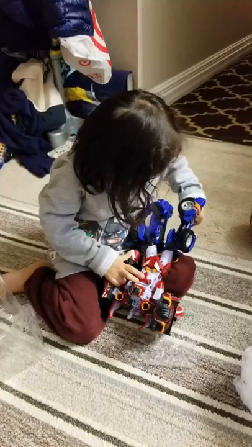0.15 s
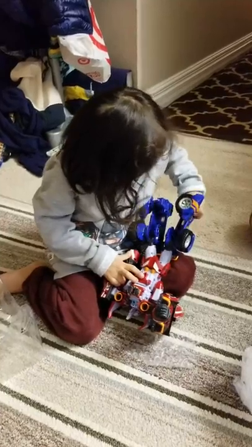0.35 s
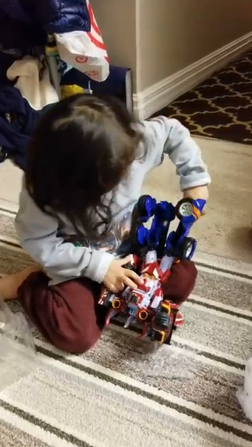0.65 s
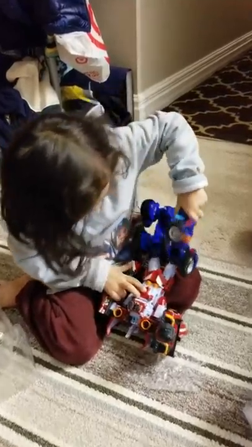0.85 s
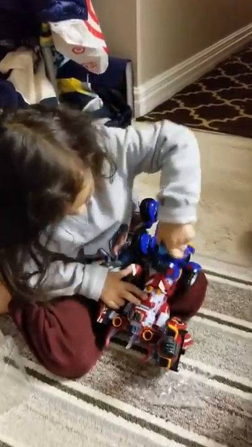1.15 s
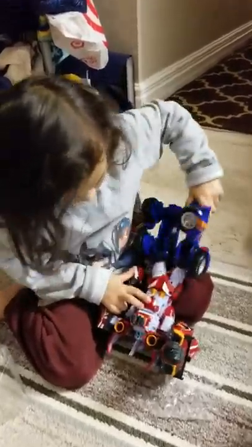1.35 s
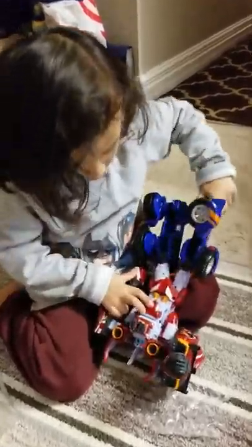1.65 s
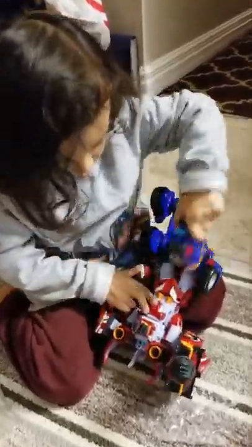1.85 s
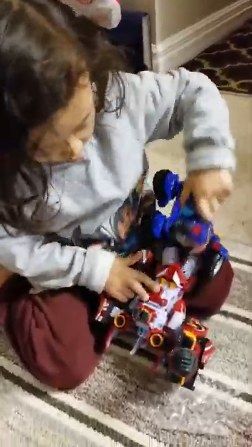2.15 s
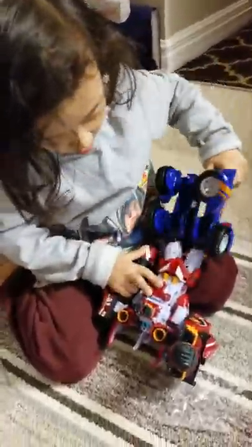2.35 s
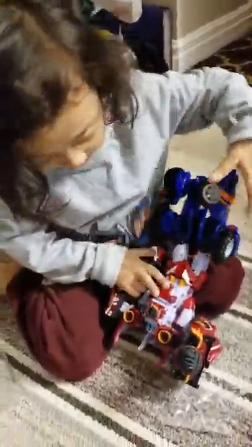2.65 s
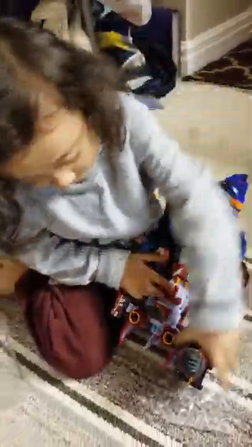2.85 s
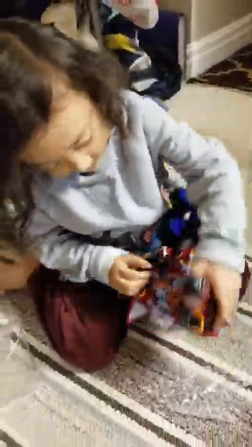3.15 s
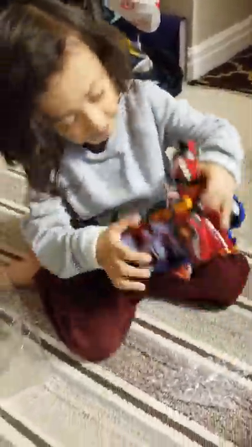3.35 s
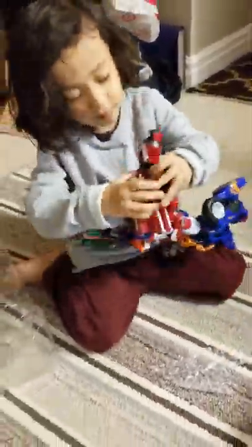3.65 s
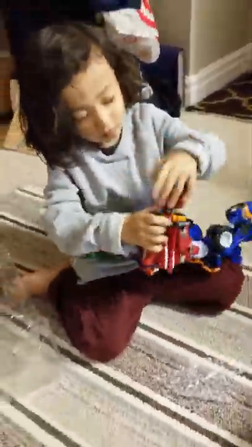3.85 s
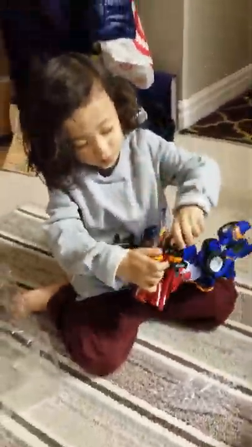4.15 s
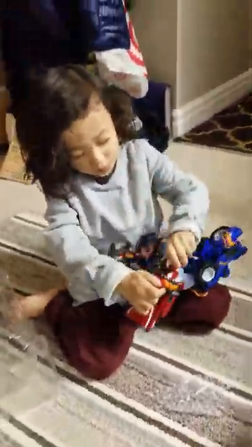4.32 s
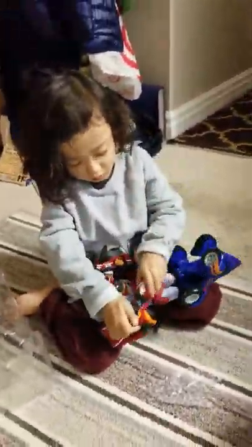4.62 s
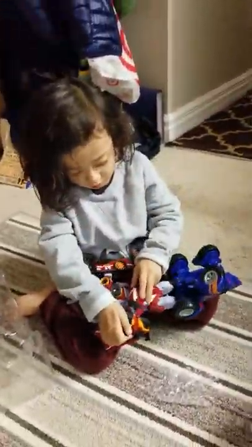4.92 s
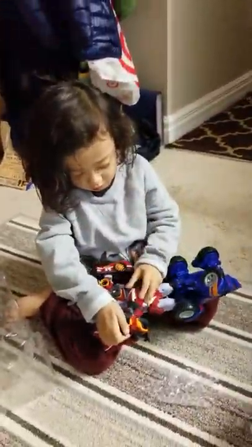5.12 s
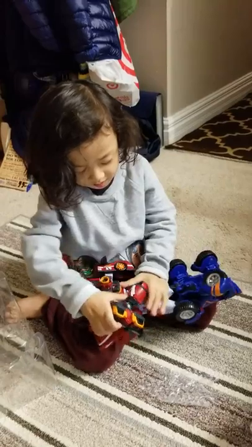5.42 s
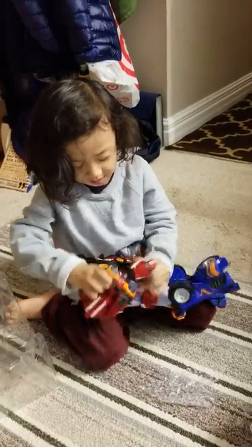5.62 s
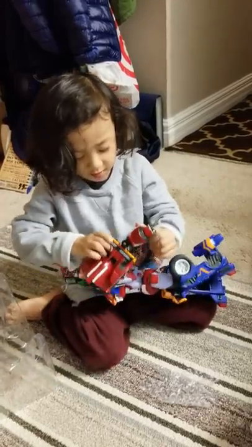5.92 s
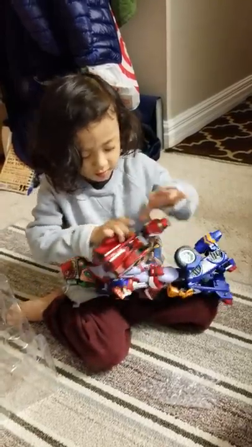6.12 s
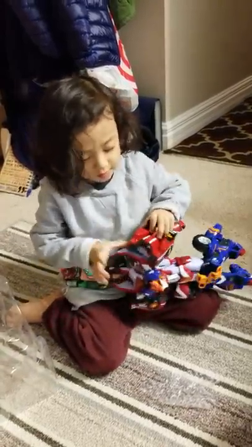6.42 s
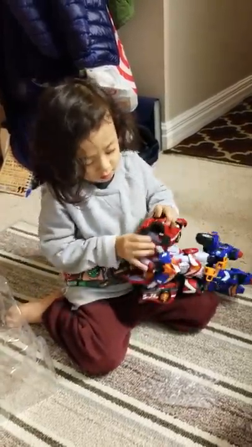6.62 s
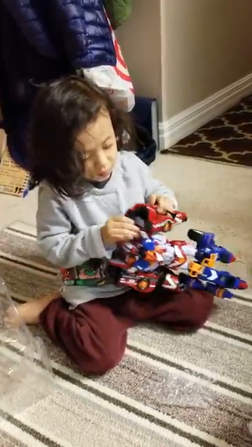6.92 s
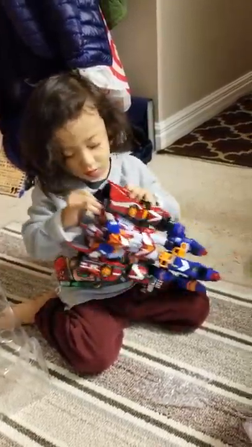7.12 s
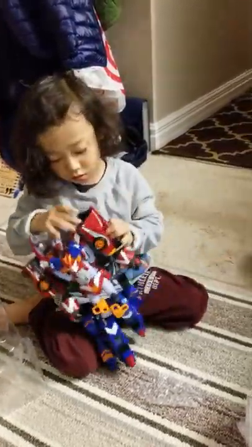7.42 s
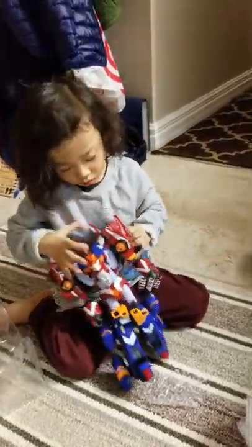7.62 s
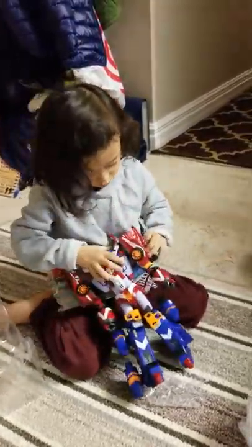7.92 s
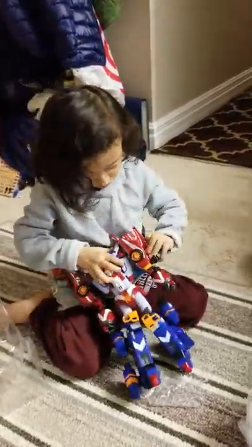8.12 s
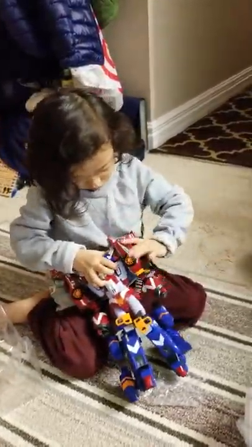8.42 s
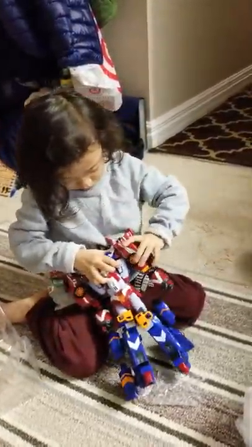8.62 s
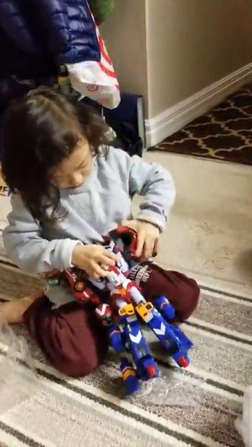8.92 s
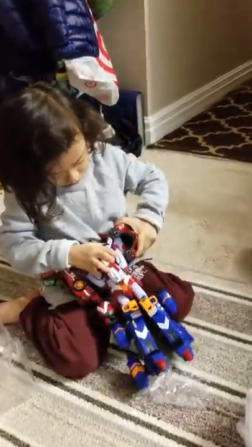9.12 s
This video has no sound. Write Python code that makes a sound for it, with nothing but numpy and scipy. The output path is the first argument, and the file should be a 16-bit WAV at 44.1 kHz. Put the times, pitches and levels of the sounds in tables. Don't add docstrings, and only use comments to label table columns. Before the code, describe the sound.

A phone a metre away picks up bright, dry cracks from a plastic toy's ratchet joints, each with a hollow knock and short room reflection. Dense loud runs give way to scattered clacks, a slower clicking joint and a brief lower hinge burst. Fingers rub plastic, shells rattle and sleeves shuffle lightly. The ending is quieter, with small clicks and ticks over a distant appliance hum and soft hiss.

```python
import sys
import numpy as np
from scipy import signal
from scipy.fft import rfft, irfft, next_fast_len
from scipy.io import wavfile
from scipy.ndimage import uniform_filter1d

SR = 44100
rng = np.random.default_rng(int(sys.argv[2]) if len(sys.argv) > 2 else 0)


def elevation(decibels):
    levels = np.asarray(decibels, float)
    return 10 ** (levels / 20)


def to_wav(s):
    ch = np.atleast_2d(s).T
    pcm = np.round(np.clip(ch, -1, 1) * 32767)
    wavfile.write(sys.argv[1], SR, pcm.astype(np.int16))


N = 408807

# (frequency [Hz], density [dB per Hz])
AIR = [(12, -49.5), (20, -16), (116, 0), (146, -9), (262, -22), (301, -17.5), (434, -33), (513, -28.5),
       (949, -35), (1090, -32.5), (1760, -33.5), (2600, -41.5), (16000, -42)]
# (time [s], level [dB])
RUMBLE = [(0, -63.5), (.85, -61.5), (2.2, -66), (3.3, -63.5), (5.6, -68.5), (6.5, -73), (7.3, -64.5),
          (8.2, -67), (9.27, -64.5)]
# (time [s], length [s], level [dB], pitch [Hz])
DRAGS = [
    (5.03, 0.27, -83, 1750),
    (7.905, 0.284, -78.5, 1580),
    (8.05, 0.068, -75, 5400),
    (8.2, 0.074, -72, 4300),
    (8.4, 0.14, -75, 3300),
    (5.358, .06, -74, 5700),
    (6.3, 0.15, -76.5, 3200),
    (4.1, 0.19, -60, 1300),
    (.2, 0.23, -84, 1450),
]
# (time [s], finger rub level [dB])
EFFORT = [(.55, -98), (.8, -63.5), (2.22, -73.5), (2.6, -84), (3.07, -63.5), (3.4, -66), (4.05, -75.5),
          (4.4, -71), (4.85, -90), (5.4, -81.5), (5.73, -66.5), (6.1, -89.5), (6.38, -55.5), (6.7, -92.5),
          (7.1, -62.5), (7.64, -61), (7.9, -81), (9.27, -80)]
# (frequency [Hz], density [dB per Hz])
RUB_COLOUR = [(1470, -26.5), (2500, -9), (3360, -10), (5030, 7), (8940, -7), (12400, -1), (16000, -14.5)]

# (time [s], crack peak [dB], shell knock peak [dB])
LEG_OUT = [(.6023, -9, -15), (.663, -9, -24), (.6666, -11.5, -12.5), (.7196, -6.5, -9.5),
           (.7731, -5.5, -11), (.8099, -7, -15), (.8511, -5.5, -9.5), (.8881, -8, -20), (.9245, -10.5, -12),
           (.958, -7.5, -21), (.9946, -7, -24), (1.0337, -9, -20.5)]
LEG_IN = [(1.1699, -7, -21), (1.2048, -6.5, -27.5), (1.2293, -5, -14), (1.2517, -2.5, -26),
          (1.2722, -5.5, -19.5), (1.2957, -8, -12.5), (1.3685, -8, -17.5), (1.4242, -6, -13.5)]
LEG_BACK = [(1.738, -10, -12.5), (1.7553, -7.5, -25), (1.7763, -5, -15.5), (1.8, -8.5, -18),
            (1.8272, -10, -16), (1.8551, -9, -27), (1.8922, -9, -23.5), (1.9417, -11.5, -29),
            (2.1013, -11, -30), (2.1336, -7, -18), (2.1611, -8.5, -19), (2.1926, -4.5, -16.5),
            (2.232, -6, -21), (2.2673, -6.5, -18), (2.3035, -9, -16.5)]
ARM = [(4.0975, -18.5, -41), (4.1802, -17, -37), (4.225, -6, -17), (4.262, -6.5, -21.5),
       (4.3228, -20.5, -29), (4.3419, -7.5, -20), (4.42, -10, -13), (4.4551, -8, -19), (4.5371, -17, -28.5),
       (4.5769, -9.5, -16), (4.6183, -8.5, -19), (4.635, -8.5, -43.5)]
HINGE = [(5.6, -9, -23), (5.6118, -4.5, -18.5), (5.6172, -12.5, -21.5), (5.6286, -12, -24.5),
         (5.6549, -7, -37), (5.6788, -10, -15.5), (5.7296, -6.5, -26.5), (5.7724, -9.5, -19)]
WING = [(6.8977, -22, -47), (6.9966, -17, -50), (7.067, -17.5, -50), (7.1584, -20, -45)]
SHOULDER = [(8.4978, -14.5, -27.5), (8.6526, -21.5, -37), (8.6884, -9, -32), (8.6971, -19, -32),
            (8.7253, -10, -40), (8.7348, -25, -30), (8.7506, -12.5, -29), (8.7644, -17, -38),
            (8.7825, -14.5, -47), (8.8035, -23.5, -44), (9.0989, -19, -42.5), (9.1205, -19.5, -45.5),
            (9.1317, -23, -56), (9.2664, -30.5, -66)]
# (teeth table, treble share [dB], left minus right [dB], shell pitch [Hz], knock lag [s])
JOINTS = [
    (LEG_OUT, -13.5, 2, 2070, .008),
    (LEG_IN, -15.5, 2, 2040, .004),
    (LEG_BACK, -15, 3.6, 1970, .009),
    (ARM, -12.5, 5.5, 2240, -.001),
    (HINGE, -13, 5, 1380, -.001),
    (WING, -11, 8.9, 1920, 0.000946),
    (SHOULDER, -11.5, 4.2, 1966, -0.00078),
]
# (time [s], crack peak [dB])
LIFT = [(2.5782, -50.5), (2.772, -58), (2.8535, -32.5), (2.8915, -19.5), (2.9033, -44), (3.0372, -42),
        (3.077, -47), (3.2131, -31.5), (3.2274, -38), (3.2755, -39), (3.333, -43.5), (3.4083, -46),
        (3.539, -54), (3.5483, -45), (3.6202, -45), (3.6995, -44.5), (3.7393, -17.5), (3.7461, -26),
        (3.769, -17.5), (4.0366, -45)]
# (time [s], crack peak [dB])
TURN = [(4.851, -53.5), (4.946, -70), (5.3589, -54), (5.5495, -50.5), (6.198, -33.5), (6.203, -30.5),
        (6.2417, -29), (6.3128, -12), (6.4848, -41), (7.2506, -58), (7.3368, -22), (7.3703, -26),
        (7.3828, -28.5), (7.4415, -27.5), (7.4651, -27.5), (7.503, -34), (7.5714, -44), (7.593, -46),
        (7.6068, -36), (7.6649, -27), (7.743, -35.5), (7.7592, -34.5), (7.815, -43.5), (8.0543, -61),
        (8.1381, -55.5), (8.221, -46), (8.2684, -48), (8.4136, -48.5)]
# (time [s], crack peak [dB])
NAILS = [
    (4.936, -46.5),
    (5.4607, -41),
    (6.236, -43),
    (7.8143, -37),
    (8.4579, -56),
    (8.7083, -31),
]
# (frequency [Hz], density [dB per Hz])
SNAP_COLOUR = [(150, -60.5), (250, -37.5), (691, -30), (1300, -12), (2400, -6), (3230, -5), (4280, -3.5),
               (4670, -2), (12700, 1.5), (15400, 0.5), (16500, -24.5)]
# (frequency [Hz], sharpness [Q], level [dB])
LOOSE_PARTS = [(1310, 9.2, -10.5), (1960, 5.2, -3), (3900., 12, -14.5), (5830, 4.6, -14.5),
               (12000., 4.1, -16.5)]

# (time [s], peak [dB], ring [Hz])
KNOCKS = [(2.855, -33, 1390), (2.889, -30.5, 1500), (3.106, -31.5, 1770), (3.213, -26.5, 1780),
          (3.3036, -33.5, 2160), (3.33, -29.5, 2080), (3.7465, -31, 1410), (3.771, -27, 1370),
          (3.8, -26, 1900), (3.8203, -27.5, 1910), (5.465, -38.5, 1880), (5.5823, -59, 2254),
          (6.1975, -27.5, 1640), (6.3117, -18, 1880), (6.409, -28, 1880), (6.8944, -41, 1950),
          (6.9922, -43, 2000), (7.017, -26, 1910), (7.0716, -25, 1960), (7.1573, -27, 1960),
          (7.182, -30.5, 1370), (7.2035, -32, 2000), (7.2521, -37.5, 1930), (7.3345, -16.5, 1840),
          (7.3689, -23.5, 2120), (7.4629, -22.5, 2050), (7.608, -33, 1870), (7.676, -21, 1950),
          (8.2157, -34.5, 1900), (8.5598, -29, 1920)]
# (time [s], peak [dB], ring [Hz])
TICKS = [
    (5.36, -58, 5720),
    (5.464, -39.5, 6050),
    (7.5009, -34, 5650),
    (8.0536, -52.5, 4960),
    (8.1404, -51, 5900),
    (8.22, -63, 4330),
    (8.413, -49.5, 5390),
]
# (time [s], peak [dB], ring [Hz])
MORE_KNOCKS = [(2.773, -51, 1800), (4.85, -58.5, 940), (5.36, -53, 2200), (6.236, -27.5, 2060),
               (7.106, -28.5, 1940), (7.384, -24.5, 2200), (7.746, -30, 2010), (7.906, -51.5, 1300),
               (8.142, -50, 2200), (8.8038, -23, 1830), (11, -26.5, 1350), (6.085, -62, 1900), (7.858, -52, 2130),
               (3.655, -44.5, 1250)]
# (time [s], peak [dB], ring [Hz])
BUMPS = [
    (3.599, -58, 495),
    (4.636, -38, 610),
    (6.31, -53, 675),
    (7.333, -52.5, 660),
    (7.464, -45.5, 650),
    (8.688, -43.5, 690),
    (8.5, -51, 664),
    (7.676, -43, 700),
    (8.75, -53, 260),
]
# (frequency [Hz], level [dB])
NEIGHBOURS = [(1310, -9.5), (1900, -8.5), (2320, -11), (3750, -18)]

# (frequency [Hz], T60 [s], level [dB])
ROOM = [(300, 0.34, -8.5), (1000, 0.12, -11.5), (2000, .25, -11), (5000, 0.28, -14.5), (15800, 0.22, -17.5)]
# (delay [s], level [dB])
ECHOES = [(.0092, -10), (.016, -13.5)]

LIFT_PAN_DB, TURN_PAN_DB, NAIL_PAN_DB, PAN_SCATTER_DB = 1.5, 5, 4.5, 1.26
TREBLE_DB, NAIL_TREBLE_DB, DULLING = -13.5, 5.5, .15
KNOCK_ROOM_SHARE = 0.6


def unit(x):
    return x / np.sqrt(np.mean(x ** 2))


def colour(table, hz):
    f, db = np.transpose(table)
    return elevation(np.interp(np.log(np.maximum(hz, 1)), np.log(f), db))


def noise(table, bass_alike_hz):
    size = next_fast_len(N)
    hz = np.arange(size // 2 + 1) * SR / size
    mid, side = rfft(rng.standard_normal((2, size)))
    side = side * hz / (hz + bass_alike_hz)
    ports = np.array([mid + side, mid - side])
    return unit(irfft(colour(table, hz) * ports, size)[:, :N])


def grains(rate, spread_db):
    hits = rng.random(N) < rate / SR
    size_db = spread_db * np.minimum(rng.exponential(size=N), 4)
    x = hits * rng.standard_normal(N) * elevation(size_db)
    return x / (np.std(x) + 1e-12)


def air():
    gain_db = np.interp(np.arange(N) / SR, *np.transpose(RUMBLE))
    return elevation(gain_db) * noise(AIR, 500.)


def drags():
    t, out = np.arange(N) / SR, 0
    for start, length, db, hz in DRAGS:
        fade = (t > start) * np.clip(1 - (t - start) / length, 0, 1) ** .6
        ring = signal.iirpeak(hz, 9.9, fs=SR)
        whisper = signal.lfilter(*ring, signal.lfilter(*ring, grains(900, 3.6)))
        out = out + elevation(db) * fade * unit(whisper)
    pan_db = -2
    return out * elevation(np.array([[pan_db], [-pan_db]]) / 2)


def hand_gains():
    rub_db = np.minimum(np.interp(np.arange(N) / SR, *np.transpose(EFFORT)), -50)
    shuffle_db = -71 + 0.32 * (rub_db + 55.5)
    return elevation(rub_db), elevation(shuffle_db)


def hands():
    rub_gain, shuffle_gain = hand_gains()
    ticks = signal.lfilter(*signal.iirpeak(1800., 1.5, fs=SR), grains(700, 2.5))
    low, middle, high = [signal.lfilter(*signal.iirpeak(hz, 6.0, fs=SR), ticks)
                         for hz in (1350., 1850., 2200.)]
    rattle = np.array([1.2 * low + middle + high, 2.6 * low + middle - 0.72 * high])
    grit = 1 + 6.0 * np.abs(uniform_filter1d(np.abs(grains(200, 2.0)), size=200))
    rub = noise(RUB_COLOUR + [(16800, -57)], 260.0) * grit
    cloth_band = signal.butter(2, (200., 800.), "band", fs=SR, output="sos")
    shuffle = unit(signal.sosfilt(cloth_band, rng.standard_normal(N)))
    return rub_gain * (unit(rattle) + unit(rub)) + shuffle_gain * elevation(-9) * shuffle


def strike(at, peak_db, pan_db, gains, t60, rise, size=1024):
    t = np.arange(size) / SR
    hz = np.arange(size // 2 + 1) * SR / size
    shape = (1 - np.exp(-t / rise)) ** 2 * np.exp(-np.log(1000) * t / t60)
    contact = rng.standard_normal((len(at), 2, size)) * shape
    mid, side = rfft(contact).transpose(1, 0, 2)
    side = side * hz / (hz + 390.0)
    cepstrum = irfft(np.log(gains(np.maximum(hz, 60)) + 1e-4), size)
    fold = np.r_[1, np.full(size // 2 - 1, 2), 1, np.zeros(size // 2 - 1)]
    causal = np.exp(rfft(cepstrum * fold))
    bursts = irfft(causal[:, None] * np.stack([mid + side, mid - side], axis=1), size)
    bursts = bursts / (np.abs(bursts).max(axis=2, keepdims=True) + 1e-12)
    out = np.zeros((2, N + size))
    for k, burst in enumerate(bursts):
        i = int(np.clip(at[k] * SR, 0, N - 1))
        gain = elevation(peak_db[k] + np.array([[pan_db[k]], [-pan_db[k]]]) / 2)
        out[:, i:i + size] += gain * burst
    return out[:, :N]


def cracks():
    groups = [joint[:3] for joint in JOINTS]
    groups += [(LIFT, TREBLE_DB, LIFT_PAN_DB), (TURN, TREBLE_DB, TURN_PAN_DB),
               (NAILS, NAIL_TREBLE_DB, NAIL_PAN_DB)]
    rows = []
    for table, treble_db, pan_db in groups:
        for s, db, *_ in table:
            rows.append((s, db, treble_db + DULLING * (db + 10), pan_db))
    at, db, treble_db, pan_db = np.transpose(rows)
    return at, db, treble_db, pan_db + PAN_SCATTER_DB * rng.standard_normal(len(at))


def chatter(at, db, big_joint):
    shake = np.zeros(N)
    start = np.minimum((at * SR).astype(int) + 220, N - 1)
    shake[start] = elevation(db + np.where(big_joint, -1, -9))
    shake = signal.lfilter([1], [1, -np.exp(-1 / (0.044 * SR))], shake)
    ticks = np.array([grains(700, 2.0), grains(700, 2.0)]) * shake
    return sum(elevation(part_db) * signal.lfilter(*signal.iirpeak(hz, q, fs=SR), ticks)
               for hz, q, part_db in LOOSE_PARTS)


def snaps():
    at, db, treble_db, pan_db = cracks()
    ripple = rng.standard_normal((len(at), 24))
    big_joint = at < 2.4

    def gains(hz):
        bands_hz = np.linspace(1000, 16000, 24)
        own_db = 2.0 * np.array([np.interp(hz, bands_hz, r) for r in ripple])
        own_db += np.where(big_joint, 4.0, -3.0)[:, None] * (hz < 1000)
        treble_octaves = np.clip(np.log2(hz / 5000), 0, 1.3)
        own_db += 1.38 * (treble_db[:, None] + 8.5) * treble_octaves
        return colour(SNAP_COLOUR, hz) * elevation(own_db)

    crack = strike(at, db + 0.5, pan_db, gains, t60=0.015, rise=.0003)
    return crack + elevation(-19.5) * chatter(at, db, big_joint)


def shells():
    rows = []
    for teeth, *_, hz, lag in JOINTS:
        for s, _, db in teeth:
            rows.append((s + lag, db, hz * (1 + 0.046 * rng.standard_normal())))
    return rows


def knocks():
    at, db, ring_hz = np.transpose(shells() + KNOCKS + TICKS + MORE_KNOCKS + BUMPS)
    is_shell = ((ring_hz > 1000) & (ring_hz < 3000))[:, None]

    def ring(hz, centre_hz):
        return 1 / (1 + (6.5 * (hz / centre_hz - centre_hz / hz)) ** 2)

    def gains(hz):
        along = sum(elevation(share_db) * ring(hz, centre_hz) for centre_hz, share_db in NEIGHBOURS)
        return ring(hz, ring_hz[:, None]) + is_shell * along + elevation(-39)

    return strike(at, db + 0.67, np.full_like(at, -2.5), gains, t60=.012, rise=0.00028)


def wall_echoes(x):
    walls = np.zeros((2, 1024))
    for delay, echo_db in ECHOES:
        i = int(delay * SR)
        smear = rng.standard_normal((2, 24)) * np.exp(-np.arange(24) / 4) / 1.5
        walls[:, i:i + 24] += elevation(echo_db) * smear
    return np.array([signal.oaconvolve(x.mean(axis=0), wall)[:N] for wall in walls])


def diffuse_tail(x, size=256):
    hop = size // 2
    stft = dict(nperseg=size, noverlap=size - hop)
    hz, _, source = signal.stft(x.mean(axis=0), SR, **stft)
    field = signal.stft(rng.standard_normal((2, N)), SR, **stft)[2]
    field = field / np.sqrt(np.mean(np.abs(field) ** 2))
    hz = np.maximum(hz, 50)
    alike = 120.0 / (hz[:, None] + 88.0)
    field[1] = (field[1] + alike * field[0]) / np.sqrt(1 + alike ** 2)
    blur = np.exp(-(np.log2(hz[:, None] / hz) / .1) ** 2)
    energy = ((blur / blur.sum(axis=1, keepdims=True)) @ np.abs(source) ** 2).T
    f, t60, db = np.transpose(ROOM)
    band_t60 = np.interp(np.log(hz), np.log(f), t60)
    keep = np.exp(-2 * np.log(1000) * hop / (band_t60 * SR))
    for k in range(1, len(energy)):
        energy[k] = keep * energy[k - 1] + (1 - keep) * energy[k]
    band_gain = elevation(13 + np.interp(np.log(hz), np.log(f), db))[:, None]
    tail = signal.istft(band_gain * np.sqrt(np.abs(energy.T)) * field, SR, **stft)[1]
    tail = np.pad(tail, ((0, 0), (size, 0)))[:, :N]
    tail[0] *= elevation(2.0)
    return tail


def room(x):
    return x + diffuse_tail(x) + wall_echoes(x)


def scene():
    floor = air()
    handling = drags() + hands()
    hollow = knocks()
    wet = room(snaps() + KNOCK_ROOM_SHARE * hollow + handling)
    return wet + (1 - KNOCK_ROOM_SHARE) * hollow + floor


def band_limit(x):
    return signal.sosfilt(signal.butter(12, 17000, fs=SR, output="sos"), x)


def record(dry):
    rounded = np.tanh(dry)
    top_cut = signal.ellip(8, .2, 70, 16300, fs=SR, output="sos")
    return band_limit(signal.sosfilt(top_cut, rounded))


dry = scene()
out = record(dry)
to_wav(out)
```